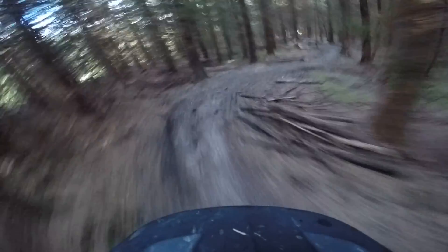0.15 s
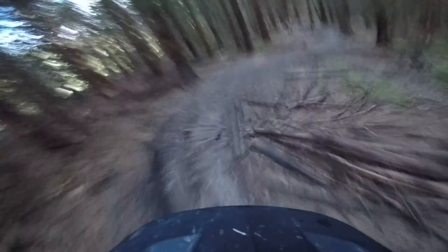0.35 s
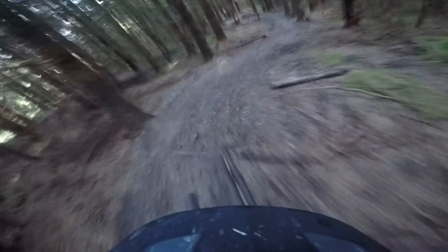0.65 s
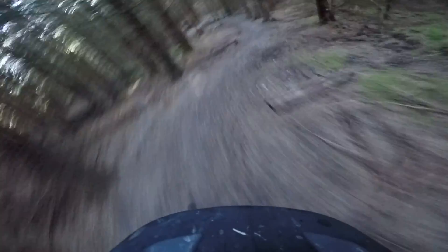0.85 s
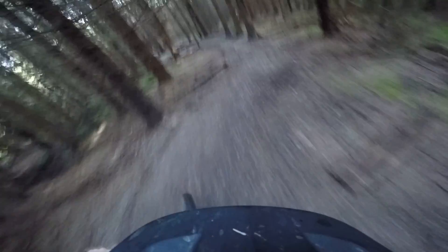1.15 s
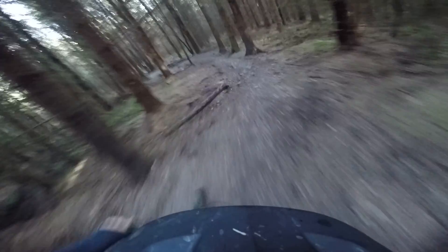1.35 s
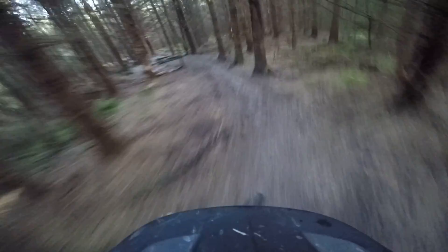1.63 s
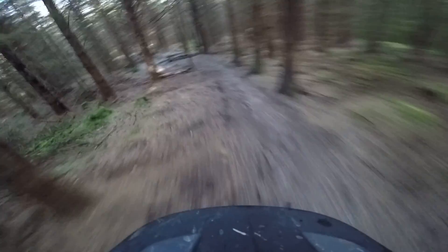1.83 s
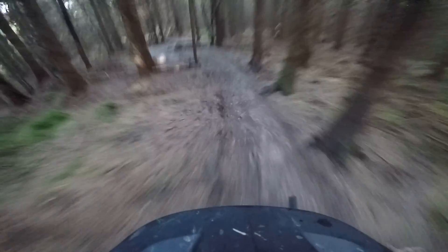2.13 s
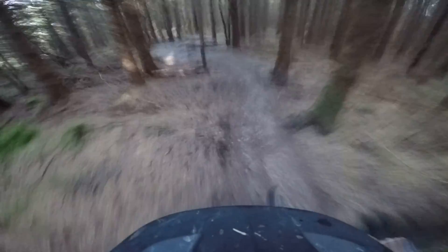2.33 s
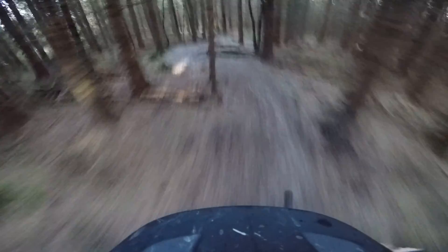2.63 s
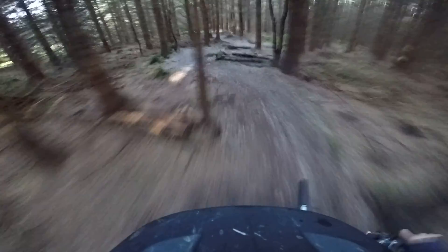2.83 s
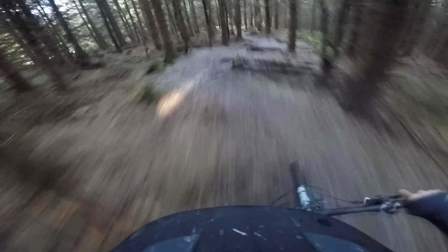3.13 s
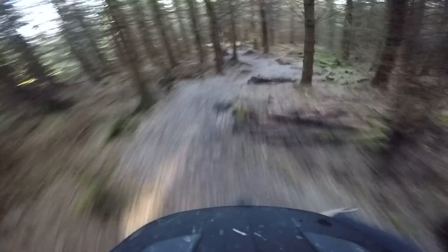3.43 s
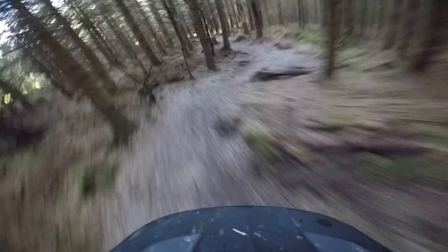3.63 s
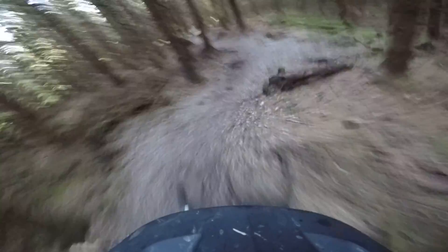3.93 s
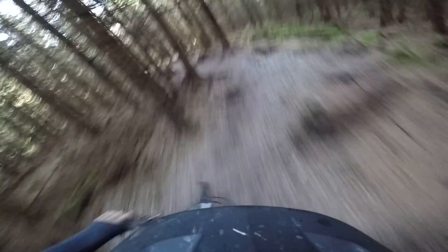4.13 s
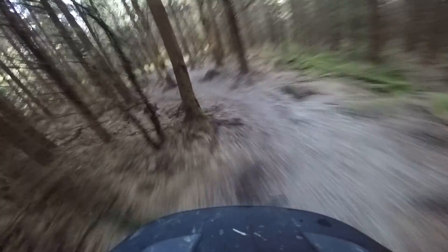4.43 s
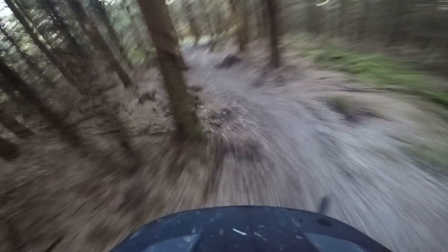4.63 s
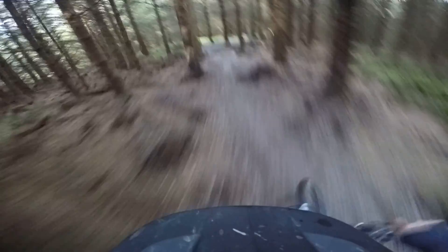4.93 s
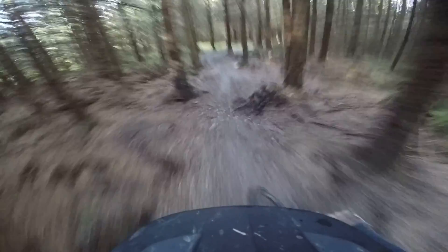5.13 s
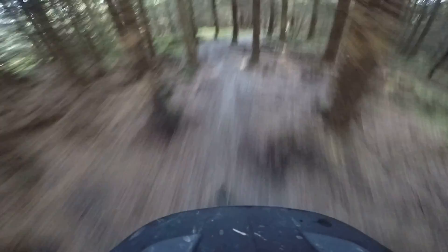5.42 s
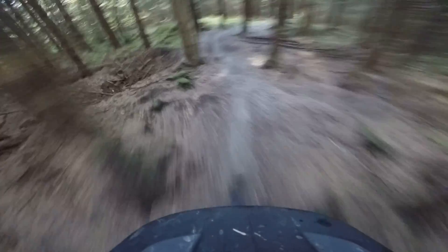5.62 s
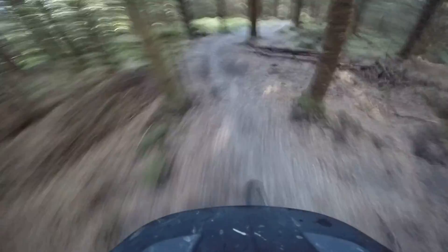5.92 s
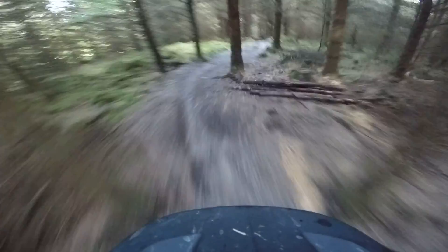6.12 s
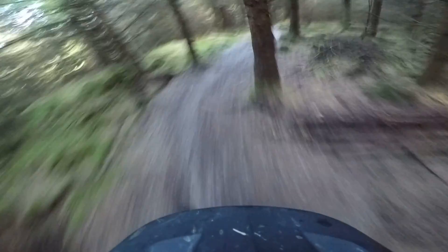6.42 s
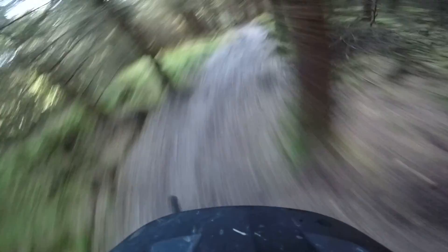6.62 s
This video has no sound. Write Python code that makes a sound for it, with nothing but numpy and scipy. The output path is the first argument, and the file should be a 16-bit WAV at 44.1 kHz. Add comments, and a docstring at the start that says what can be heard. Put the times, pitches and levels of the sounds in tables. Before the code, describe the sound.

A fast downhill bike ride heard from the helmet: low wind slaps, rushing tyres on gravel, buzzing freewheel, clattering chain and dull jolts.

```python
"""A mountain bike runs fast down a forest trail, heard from the rider's helmet.
From the start wind buffets the microphone (shed eddies), the helmet drones (filtered noise), tyres roar and
spray grit (random grains), the freewheel buzzes (pulsed noise) and a faint whistle pulses (a sine).
Soon chain and frame knock (struck modes), parts zing (stick-slip) and tick, wind slaps the microphone (pulses),
tyres crunch stones (coarse grains), and the hardest bumps thump through the helmet (a decaying mode)."""
import sys
import numpy as np
from scipy import signal
from scipy.fft import rfft, irfft, next_fast_len
from scipy.io import wavfile
from scipy.ndimage import uniform_filter1d

SR = 44100
rng = np.random.default_rng(int(sys.argv[2]) if len(sys.argv) > 2 else 0)


def generate_wav(sig):
    """Save sig (samples, or channels by samples) to the path in sys.argv[1] as 16-bit PCM at SR."""
    pcm = np.round(np.clip(np.atleast_2d(sig).T, -1, 1) * 32767).astype(np.int16)
    wavfile.write(sys.argv[1], SR, pcm)


N = 298557
TIME = np.arange(N) / SR

# hardest slaps of wind, each a separate pressure pulse: (time [s], peak before rounding off [dB], width [s])
SLAPS = [(0.245, -5.5, 0.023), (0.324, -5, 0.027), (0.635, -4.5, 0.019), (0.799, -3.5, 0.022),
         (1.244, -6, 0.02), (1.69, -13.5, .013), (2.074, -5.5, 0.022), (2.306, -7.5, 0.017),
         (3.108, -5, 0.021), (3.805, -8, 0.021), (3.91, -0.5, 0.019), (4.36, -7, 0.019),
         (5.085, -7.5, 0.017), (5.777, -5, 0.025), (6.393, -4.5, 0.026)]
# hard bumps that shake the helmet:
# (time [s], peak [dB], settled pitch [Hz], t60 [s], judder relative to the thump [dB])
BUMPS = [(0.752, -21, 104, 0.2, -26), (0.94, -27.5, 104, 0.39, -20), (2.346, -21, 104, 0.3, -19),
         (2.452, -25, 105, 0.12, -19), (3.838, -15.5, 109, 0.15, -20), (3.882, -21, 115, 0.11, -10),
         (4.712, -28, 108, 0.17, -23), (4.808, -28, 113.5, 0.18, -19), (5.052, -9.5, 105.5, 0.12, -15.5),
         (5.076, -26, 124, 0.12, -8), (5.749, -30, 100, 0.24, -22), (6.3, -29, 105, 0.1, -4.5)]


def from_db(db):
    """Level as the logarithm of amplitude: decibels to gain."""
    return 10 ** (np.asarray(db) / 20)


def rms_one(x):
    """Effective value: scale to rms 1."""
    return x / np.sqrt(np.mean(x ** 2) + 1e-20)


def peak_one(x):
    """Peak amplitude: scale to peak 1."""
    return x / np.max(np.abs(x))


def blow_one(x):
    """Energy of a transient: scale a blow to the energy of 16 ms at rms 1."""
    return x / np.sqrt(np.sum(x ** 2) / (.016 * SR))


def in_time(rows):
    """Linear interpolation: the columns of a curve at every sample."""
    s, *columns = np.transpose(rows)
    return [np.interp(TIME, s, c) for c in columns]


def add(out, s, sound):
    """Superposition: mix a short sound in at time s."""
    at = max(round(s * SR), 0)
    out[at:at + len(sound)] += sound[:N - at]


def coloured(x, spectrum):
    """Linear filtering: shape a steady signal by gains over log frequency, to rms 1."""
    size = next_fast_len(N)
    hz, db = np.transpose(spectrum)
    bins = np.maximum(np.arange(size // 2 + 1) * SR / size, 1)
    gain_db = np.interp(np.log(bins), np.log(hz), db, left=-100, right=-100)
    return rms_one(irfft(rfft(x, size) * from_db(gain_db), size)[:N])


def drift(per_s):
    """Slow random modulation: normal draws joined by straight lines, rms 1."""
    return rms_one(np.interp(TIME * per_s, np.arange(N), rng.standard_normal(N)))


def uneven(t, per_s, spread_db):
    """Random amplitude modulation of a short sound, as a gain."""
    return from_db(spread_db * np.interp(t * per_s, np.arange(len(t)), rng.standard_normal(len(t))))


def band(x, low_hz, high_hz):
    """Causal band-pass filtering."""
    edges = [low_hz, min(high_hz, SR / 2 - 1000)]
    return signal.sosfilt(signal.butter(2, edges, "band", fs=SR, output="sos"), x)


def evened(x, seconds):
    """Envelope normalisation: take the slow swells out of a noise, leaving its fast ones."""
    window = int(seconds * SR)
    power = uniform_filter1d(uniform_filter1d(x ** 2, window), window)
    return x / np.sqrt(power + 1e-9)


def dying(t, t60):
    """Exponential decay by 60 dB in t60."""
    return np.exp(-np.log(1000) * t / t60)


def ring(t, hz, t60):
    """Damped free vibration of a struck mode."""
    return np.sin(2 * np.pi * hz * t) * dying(t, t60)


def grains(per_s, spread_db):
    """Shot noise: random clicks of uneven size and sign, rms 1."""
    sizes = from_db(spread_db * np.minimum(rng.exponential(1, N), 4))
    return rms_one(sizes * rng.choice([-1, 1], N) * (rng.random(N) < per_s / SR))


def swell(start, length, edge_s):
    """Linear envelope: rise, hold and fall between 0 and 1, half way up at the start and the end."""
    return np.clip(.5 + np.minimum(TIME - start, start + length - TIME) / edge_s, 0, 1)


def summed_db(steady_db, swells, edge_s):
    """Power addition: level of a steady sound with swells of (start, length, dB) on top."""
    power = from_db(steady_db) ** 2
    power = power + sum((from_db(db) * swell(s, length, edge_s)) ** 2 for s, length, db in swells)
    return 10 * np.log10(power)


def scattered(level_db, count):
    """Stratified sampling: a random moment in each equal stretch of the ride, with the level there."""
    times = (np.arange(count) + rng.random(count)) / count * TIME[-1]
    return zip(times, np.interp(times, TIME, level_db))


def shell(x):
    """Resonant transmission: modes of helmet shell and visor lift or lower narrow bands."""
    # resonances in series: (frequency [Hz], width [Hz], lift, negative for a dip [dB])
    resonances = [(360, 18, 3), (455, 142, -4.5), (600, 35, 3.5), (677, 128, -3.5), (825, 30, 3.5),
                  (1004, 166, 2), (1410, 85, 3), (1939, 119, 8.5), (2200, 53, 0), (2414, 68, 5),
                  (3730, 93, 6), (4545, 340, 9.5)]
    for hz, width_hz, lift_db in resonances:
        x = x + (from_db(lift_db) - 1) * signal.lfilter(*signal.iirpeak(hz, hz / width_hz, fs=SR), x)
    return x


def wind(crest=1.08, tearing_db=4.0):
    """Eddy shedding: the helmet sheds eddies unevenly; each presses in a sharp crest with a puff of flutter."""
    # gusts over the steady airstream: (start [s], length [s], slow buffeting [dB], fast flutter [dB])
    gusts = [(0.068, 0.099, -13.5, -27), (0.183, 0.2, -12, -29), (0.513, 0.21, -16.5, -32),
             (0.698, 0.15, -14, -30), (0.922, 0.22, -15, -26), (1.193, 0.15, -14.5, -27.5),
             (2.028, 0.17, -13, -26), (2.19, 0.23, -12, -21), (2.46, 0.13, -14.5, -21.5),
             (2.742, 0.049, -13.5, -33), (2.928, 0.1, -15, -24), (3.188, 0.23, -16.5, -30),
             (4.22, 0.13, -21.5, -27.5), (4.69, 0.12, -22, -30.5), (4.904, 0.3, -17, -31.5),
             (5.56, 0.25, -13, -31.5), (5.886, 0.32, -18, -28.5), (6.274, 0.16, -12, -32),
             (6.512, 0.21, -15, -30.5)]
    # spectrum of the fast flutter: (frequency [Hz], relative level [dB])
    flutter_spectrum = [(15, -5), (24, 1.5), (38, 3.5), (50, -7), (75, -12), (130, -23), (300, -51.5)]
    gust_edge_s = 0.0396   # rise and fall of a gust
    clear_s = 0.042        # a slap displaces the small eddies for about this long either side
    jerk_s = 0.058         # a bump jerks the head through the air for this long
    # flutter levels are relative to the peak of the bump or slap
    jerks = [(s, jerk_s, db - 9.5) for s, db, *_ in BUMPS]
    puffs = [(s - clear_s / 2, clear_s, db - 24) for s, db, _ in SLAPS]
    near_slap = np.max([np.exp(-((TIME - s) / clear_s) ** 2) for s, _, _ in SLAPS], axis=0)
    between_slaps = 1 - near_slap ** 2
    slow_gusts = [(s, length, db) for s, length, db, _ in gusts]
    fast_gusts = [(s, length, db) for s, length, _, db in gusts]
    buffet_db = summed_db(-24.5, slow_gusts, gust_edge_s)
    flutter_db = summed_db(-34.5, fast_gusts + jerks + puffs, gust_edge_s)
    eddies_per_s = 13.0 * np.exp(.3 * drift(22))
    eddy = np.cos(2 * np.pi * np.cumsum(eddies_per_s) / SR)
    pressure = np.exp(crest * eddy)   # sharp crests, round troughs
    flutter = evened(coloured(rng.standard_normal(N), flutter_spectrum), seconds=0.069)
    flutter = rms_one(flutter * from_db(tearing_db * eddy))
    lumps_db = 1.5 * drift(11)   # the airstream is never even
    buffets = from_db(buffet_db + lumps_db) * rms_one(pressure - pressure.mean()) * between_slaps
    push = slaps() + buffets + from_db(flutter_db + lumps_db) * flutter
    # the strongest gusts are rounded off
    return 1.3 * np.tanh(push / 1.3)


def helmet(stiffening=0.34, settle_s=0.0043):
    """Forced and free vibration: the trail keeps the helmet droning; a bump rings its mode and judders its mount.

    The thump starts sharp in pitch while the padding is squeezed, then settles."""
    # shaking of the helmet: (time [s], relative drone level [dB], relative rumble level [dB])
    shake = [(0, -46.5, -50), (0.9, -57.5, -60), (1.36, -48, -58), (1.5, -42.5, -54.5), (1.72, -47, -53.5),
             (2.4, -41, -48), (2.62, -44, -50), (3.15, -45.5, -48.5), (3.7, -45.5, -54.5),
             (4.05, -49.5, -57.5), (4.68, -45.5, -48), (5.4, -41.5, -51), (5.75, -47, -51.5),
             (6.3, -44, -46.5), (6.77, -42.5, -47.5)]
    # spectra of drone and rumble: (frequency [Hz], relative level [dB])
    drone_spectrum = [(50, -32), (85, -29), (102, -5.5), (114, 1), (130, -10.5), (147, -19.5), (163, -9),
                      (185, -38), (300, -59)]
    rumble_spectrum = [(130, -4.5), (190, 0.5), (250, -3.5), (310, -13), (380, -7), (470, -9.5),
                       (650, -11.5), (1200, -30)]
    drone_db, rumble_db = in_time(shake)
    drone = evened(coloured(rng.standard_normal(N), drone_spectrum), seconds=0.23)
    rumble = shell(evened(coloured(rng.standard_normal(N), rumble_spectrum), seconds=0.077))
    out = from_db(drone_db + 4.5) * drone + from_db(rumble_db + 1.7 * drift(30)) * rumble
    t = TIME[:SR // 2]
    hurried = t + stiffening * settle_s * (1 - np.exp(-t / settle_s))
    for s, db, hz, t60, judder_db in BUMPS:
        thump = peak_one(ring(hurried, hz, t60) * (1 - dying(t, t60=0.031)))
        judder = peak_one(band(rng.standard_normal(len(t)) * dying(t, t60), 144, 257))
        add(out, s, from_db(db) * peak_one(thump + from_db(judder_db) * judder))
    return out


def tyres(roar_db, grit_db, clump_db=1.5):
    """Superposed random impacts: knobs slap dirt and crush grit in clumps; both flutter with the wheel load."""
    # spectra of roar and grit: (frequency [Hz], relative level [dB])
    roar_spectrum = [(300, -7), (550, 0.5), (850, 0.5), (1400, 1.5), (1750, -3.5), (2300, -1), (2700, -1.5),
                     (3200, -15), (5000, -26.5)]
    grit_spectrum = [(1600, 2.5), (2500, 3.5), (3600, 1), (4300, -13), (5300, -13.5), (7000, -15),
                     (14000, -29)]
    load_db = 1.02 * drift(18)
    knob_slaps = grains(per_s=4500, spread_db=2.8)
    crushes = grains(per_s=8000, spread_db=2.0)
    roar = coloured(knob_slaps * from_db(clump_db * drift(180)), roar_spectrum)
    grit = coloured(crushes * from_db(clump_db * drift(180)), grit_spectrum)
    return from_db(roar_db - 3.0 + load_db) * roar + from_db(grit_db - 1.0 + load_db) * grit


def gravel(roar_db, per_s=70, level_db=-11.5, spread_db=3.5, cycles=10.4, tilt_db=-0.5):
    """Impulse response of resonators: single stones crack under the tread, each ringing at one of 18 pitches.

    A ring falls 60 dB in the given cycles; the tilt is in dB per octave."""
    pitches = np.geomspace(780, 2800, 18)
    cracks, dealt = grains(per_s, spread_db), rng.integers(0, len(pitches), N)
    out = 0
    for k, hz in enumerate(pitches):
        radius = from_db(-60 * hz / (cycles * SR))   # decay per sample
        w = 2 * np.pi * hz / SR
        struck = cracks * (dealt == k) + 1e-18   # the offset keeps the filter off denormal numbers
        stone = signal.lfilter([0, np.sin(w)], [1, -2 * radius * np.cos(w), radius * radius], struck)
        out = out + from_db(tilt_db * np.log2(hz / pitches[0])) * stone
    return from_db(roar_db + level_db) * rms_one(out)


def freewheel(level_db, pawl_hz=310, scatter_db=11.0, hiss_db=2.0):
    """Periodic impacts: pawls snap over the ratchet as decaying bursts, over a fine hiss of flung sand."""
    # spectrum of the buzz and hiss: (frequency [Hz], relative level [dB])
    buzz_spectrum = [(3000, -2), (4500, 2.5), (5500, 1.5), (6600, 3.5), (8000, -3), (9300, 1), (10600, 3),
                     (12000, -5), (14000, -3), (15500, -15)]
    teeth = np.cumsum(pawl_hz * from_db(0.73 * drift(3))) / SR
    bursts = from_db(-30 * (teeth % 1)) * rng.standard_normal(N)   # 30 dB down by the next tooth
    snaps = rms_one(bursts * from_db(scatter_db * np.tanh(drift(150))))
    sand = grains(per_s=9000, spread_db=2.0)
    return from_db(level_db + 2.0) * coloured(snaps + from_db(hiss_db) * sand, buzz_spectrum)


def whine(hz=8490, pulse_hz=20.0, level_db=-75):
    """Phase and amplitude modulation: a faint, unsteady electronic whistle that pulses."""
    tone = np.sin(2 * np.pi * hz * TIME + 1.5 * drift(40))
    pulse = ((1 + np.sin(2 * np.pi * pulse_hz * TIME)) / 2) ** 2
    return from_db(level_db) * tone * pulse


def knock(group_db, shiver_db=-10.5, crack_db=-21.0, chatter_db=3.0, chatter_per_s=420):
    """Modal excitation: one blow rings the frame in four groups of modes; loose parts chatter unevenly after it."""
    # modes of the frame: (frequency [Hz], relative strength [dB], t60 [s])
    frame = [(224.3, -4.5, 0.038), (376, -12.5, 0.018), (655, 1, 0.0067), (753, -3.5, 0.029),
             (962, 0.5, 0.025), (1120, -1, 0.019), (1310, -3, 0.03), (1530, 5.5, 0.027),
             (1769, -3.5, 0.035), (2057, -2.5, 0.02), (2305, -2.5, 0.048), (2682, 0.5, 0.03),
             (2830, -7, 0.022)]
    # edges of the thud, knock, clack and snap groups: (frequency [Hz])
    group_edges = [170, 680, 1450, 2150, 3300]
    t = TIME[:SR // 8]
    chatter = uneven(t, chatter_per_s, chatter_db)
    contact = 1 - dying(t, t60=0.0017)   # the force builds over about a millisecond
    out = 0
    for level_db, low_hz, high_hz in zip(group_db, group_edges, group_edges[1:]):
        modes = 0
        for hz, db, t60 in frame:
            if low_hz < hz <= high_hz:
                # each blow lands on another spot, so strength and pitch of a mode vary
                strength = from_db(db + 2.2 * rng.standard_normal()) * rng.choice([-1, 1])
                modes = modes + strength * ring(t, hz * (1 + 0.034 * rng.standard_normal()), t60)
        struck = blow_one(band(modes * contact, low_hz, high_hz))
        shiver = rng.standard_normal(len(t)) * chatter * dying(t, t60=0.072)
        struck = struck + from_db(shiver_db) * blow_one(band(shiver, low_hz, high_hz))
        out = out + from_db(level_db) * blow_one(struck)
    crack = band(rng.standard_normal(len(t)) * contact * dying(t, t60=0.041), 2700, 5300)
    return out + from_db(group_db[-1] + crack_db) * blow_one(crack)


def zing(hz, t60, width_hz, slip_db=2.5, slips_per_s=350):
    """Stick-slip friction: a rubbed part sings a rough note, narrow noise shifted up to its pitch."""
    t = TIME[:SR // 2]
    slips = uneven(t, slips_per_s, slip_db)
    low_pass = signal.butter(2, min(width_hz, hz / 2), fs=SR, output="sos")
    rough = signal.sosfilt(low_pass, rng.standard_normal((2, len(t))) * slips * dying(t, t60))
    phase = 2 * np.pi * hz * t
    return peak_one(rough[0] * np.cos(phase) + rough[1] * np.sin(phase))


def rattles(roar_db, tap_db=(-11, -8.5, -11.5, -17), tap_spread_db=3.5):
    """Repeated impact: a slack chain hits, then bounces; light taps and scraped zings lie in between.

    Taps (thud, knock, clack, snap) are relative to the roar level."""
    # knocks of chain and frame, as relative energies:
    # (time [s], thud [dB], knock [dB], clack [dB], snap [dB])
    knocks = [(0.105, -55.5, -38, -45, -46), (0.167, -34.5, -39, -43.5, -51),
              (0.194, -42.0, -40, -41, -43.5), (0.283, -62, -49, -53, -62), (0.367, -46, -58, -52, -52),
              (0.61, -58, -51, -51, -58), (0.674, -43, -52, -50, -48.0), (0.707, -64.0, -38, -43, -56),
              (0.732, -46, -35.5, -53, -54), (0.796, -63, -34.5, -40, -50), (0.872, -65.0, -48, -59, -64),
              (0.941, -38.5, -37, -40.5, -47), (0.952, -51, -44, -48, -53), (1.078, -47, -38.5, -42, -57),
              (1.167, -40, -41, -53, -60), (1.244, -39, -38, -46, -57), (1.282, -64.5, -45, -54, -65.5),
              (1.303, -44, -51, -66, -67), (1.421, -40, -43, -51, -65.5), (1.496, -56, -47.5, -50, -56),
              (1.722, -46, -43.5, -49, -63), (1.857, -56, -48.5, -51.5, -67.5),
              (2.088, -41.5, -39, -43, -48), (2.113, -61, -40.5, -45.5, -64), (2.142, -58, -50, -55, -64),
              (2.234, -39, -43, -45, -48.5), (2.265, -38.5, -38.5, -62.0, -50), (2.286, -56, -44, -57, -67),
              (2.316, -44, -41, -45, -53), (2.331, -57.5, -43, -55.5, -61),
              (2.345, -32.5, -38.5, -48, -52.5), (2.366, -46, -45, -54, -53), (2.378, -48, -43, -60, -61),
              (2.42, -49, -51, -61, -65), (2.458, -44.0, -49, -55, -51), (2.484, -34.5, -31.5, -45.5, -45),
              (2.513, -56, -41.5, -48, -51), (2.752, -39, -42, -45.5, -53), (2.838, -50, -45, -54, -60),
              (2.855, -44.0, -43.5, -54, -68), (2.974, -40, -39, -46.5, -55), (3.174, -47, -52, -62, -66),
              (3.187, -42, -53, -53, -55), (3.349, -47, -54, -61, -62), (3.376, -60, -45, -51, -48),
              (3.757, -35.5, -43, -54.0, -58.5), (3.764, -48.5, -37, -41.5, -51),
              (3.812, -58, -49, -49, -55), (3.835, -40, -43.5, -46, -54), (3.867, -33, -27, -41, -42.5),
              (3.881, -41, -44.5, -42, -47), (3.959, -69, -43.5, -46, -65), (4.006, -45, -42.5, -64.0, -63),
              (4.101, -44.5, -48, -65, -50), (4.257, -37, -45, -48, -66.0), (4.267, -36, -38.5, -48, -51),
              (4.303, -44, -34.5, -47, -49), (4.317, -55, -47, -49, -51), (4.359, -52, -43, -49.5, -64),
              (4.449, -65, -51, -57, -55), (4.478, -47, -59, -66.0, -57), (4.543, -41.5, -56, -73, -65),
              (4.635, -50.5, -44.5, -56, -68), (4.711, -40, -37.5, -43, -52), (4.769, -47, -47, -52, -52),
              (4.785, -60, -52, -47, -52), (4.808, -35.5, -31, -43.5, -42), (4.829, -56, -54, -49, -59),
              (4.893, -41.5, -47.5, -54, -56), (5.002, -38, -40.5, -44.5, -54), (5.011, -51, -48, -48, -54),
              (5.045, -49, -40, -62, -63), (5.052, -28.5, -30, -42, -41), (5.249, -47, -40.5, -60, -50),
              (5.311, -66, -51.5, -56, -57), (5.489, -63, -44.5, -55, -58), (5.668, -59, -51, -50, -55),
              (5.725, -54, -43, -46, -62), (5.78, -67, -41.5, -48, -54.5), (5.857, -62, -50.5, -55, -67),
              (5.911, -40.5, -37, -48, -46), (5.986, -54, -40, -46, -62), (5.999, -37.5, -51, -57.0, -65),
              (6.14, -61, -38.5, -47, -67), (6.232, -65, -39, -42, -55), (6.306, -43.5, -41.5, -49, -53),
              (6.347, -62, -52, -53, -55), (6.416, -43.5, -50, -56, -58), (6.458, -40, -50, -58, -62),
              (6.548, -59, -34.5, -41, -50)]
    # zings and rubs of chain, spokes and brakes, peak before the shell:
    # (time [s], relative peak [dB], frequency [Hz], t60 [s], half width [Hz])
    zings = [(0.105, -34, 2580, 0.11, 190), (0.813, -33, 2000, 0.04, 280), (0.825, -33, 2250, 0.037, 330),
             (0.836, -35, 1690, 0.04, 320), (0.904, -34.5, 1550, 0.06, 300), (1.205, -38, 1900, 0.12, 160),
             (1.207, -47, 3050, 0.11, 150), (1.456, -39.5, 2100, 0.2, 450), (1.497, -37, 1750, 0.22, 420),
             (1.507, -35, 1400, 0.19, 450), (2.186, -37.5, 1800, 0.054, 500), (2.901, -37, 2005, 0.12, 300),
             (3.374, -25.5, 1994, 0.058, 220), (3.64, -46.5, 1870, 0.73, 60),
             (4.115, -37.5, 2104, .16, 160), (4.15, -36, 2080, 0.059, 200), (4.217, -37.5, 2130, .06, 240),
             (4.317, -33, 1950, .04, 500), (5.18, -40, 1420, 0.14, 150), (5.321, -43.5, 1330, 0.21, 65),
             (6.53, -37, 1860, 0.1, 180)]
    out = np.zeros(N)
    for s, *group_db in knocks:
        hit, soft = knock(group_db), knock(group_db)
        lead, lag = rng.uniform(0.00054, 0.00382), rng.uniform(0.00504, 0.0094)
        add(out, s - lead, from_db(-12) * soft)   # soft onset
        add(out, s - .0005, from_db(1.5) * hit)
        add(out, s + lag, from_db(-14) * soft)   # bounce
    for s, db in scattered(roar_db, count=34):
        strength_db = db + np.array(tap_db) + rng.uniform(-tap_spread_db, tap_spread_db, size=4)
        add(out, s, knock(strength_db))
    for s, db, hz, t60, width_hz in zings:
        add(out, s, from_db(db) * zing(hz, t60, width_hz))
    return out


def ticks(freewheel_db, pebble_ring_db=-11, pebble_splash_db=-22, pebble_spread_db=1.0, pebble_t60_s=0.013):
    """Hard contact: a brief metallic ring under a bright splash, both from one decaying noise.

    Small stones tick at random moments, relative to the freewheel level."""
    # sharp ticks of metal and flung stones, as relative energies:
    # (time [s], ring [dB], splash [dB], t60 of the noise [s])
    hard_ticks = [(0.106, -44, -58, 0.052), (0.306, -56, -59, .026), (0.734, -55, -72, 0.0098),
                  (0.805, -56, -61, .067), (0.83, -55, -75, 0.055), (0.888, -53, -73, 0.086),
                  (0.935, -50, -55, 0.15), (1.016, -54, -57, 0.02), (1.495, -57.5, -82, .035),
                  (2.09, -52, -60, 0.0043), (2.186, -55, -65, 0.061), (2.236, -58, -63, 0.038),
                  (2.676, -56, -61, 0.015), (2.816, -48.5, -56, 0.064), (2.954, -55, -63, 0.018),
                  (3.023, -51, -61, 0.022), (3.1, -55, -59, 0.048), (3.26, -56, -59, 0.015),
                  (3.867, -55, -76, .012), (4.114, -55.5, -61, 0.053), (4.268, -55, -81, 0.015),
                  (4.55, -55.5, -65, .032), (4.705, -55, -61, .041), (5.305, -55.5, -81, 0.099),
                  (6.4, -53, -72, .014)]
    out, t = np.zeros(N), TIME[:SR // 12]
    pebbles = []
    for s, db in scattered(freewheel_db, count=18):
        ring_db = db + pebble_ring_db + rng.normal(0, pebble_spread_db)
        splash_db = db + pebble_splash_db + rng.normal(0, pebble_spread_db)
        pebbles.append((s, ring_db, splash_db, pebble_t60_s))
    for s, ring_db, splash_db, t60 in hard_ticks + pebbles:
        chatter = rng.standard_normal(len(t)) * dying(t, t60) * (1 - dying(t, t60 / 5))
        splash = band(band(chatter, 7500, 11800), 7500, 11800)
        add(out, s - .001, from_db(ring_db) * blow_one(band(chatter, 1450, 5100)))
        add(out, s - .001, from_db(splash_db) * blow_one(splash))
    return out


def slaps(lean=0.4):
    """Pressure pulse of a bursting eddy: suction, a sharp crest, then weaker suction.

    The lean is a phase in radians that deepens the suction ahead."""
    out, t = np.zeros(N), TIME[:SR // 3]
    middle = t[-1] / 2
    for s, db, width_s in SLAPS:
        pulse = np.real(np.exp(-1j * lean) / (1 - 1j * (t - middle) / width_s) ** 3)
        add(out, s - middle, from_db(db) * peak_one(pulse))
    return out


def crunches(edge_s=0.019):
    """Sparse shot noise: a tyre skids over loose stones in a short, coarse run of cracks."""
    # skids: (start [s], length [s], relative level [dB])
    skids = [(0.592, 0.019, -45), (0.929, 0.031, -39), (1.244, 0.016, -44), (2.181, 0.027, -42),
             (2.318, 0.073, -55), (2.436, 0.042, -39.5), (2.827, 0.025, -47.5), (4.812, 0.028, -48),
             (5, 0.028, -43), (5.189, 0.017, -45), (5.923, 0.014, -48), (6.21, 0.017, -41),
             (6.345, 0.029, -49)]
    # spectrum of the cracks: (frequency [Hz], relative level per Hz [dB])
    crack_spectrum = [(250, 3.5), (600, -6), (900, -2.5), (1400, 3.5), (1900, -7.5), (2600, 0), (3300, -17),
                      (5000, -19)]
    cracks = coloured(grains(per_s=1400, spread_db=2.5), crack_spectrum)
    return cracks * sum(from_db(db) * swell(s, length, edge_s) for s, length, db in skids)


def scene():
    """Transmission paths: the bike is heard past the helmet shell; wind and helmet reach the microphone directly.

    Only the helmet's rumble passes the shell as well."""
    # the tyres on the trail: (time [s], relative roar level [dB], relative grit level [dB])
    trail = [(0, -45.5, -57), (0.22, -42, -56), (0.48, -46, -60), (0.93, -46, -56), (1.3, -48, -58),
             (1.7, -50.5, -64.5), (2.0, -47.5, -57), (2.23, -43, -54.5), (2.47, -42.5, -52.5),
             (2.6, -46.5, -57.5), (3.5, -47, -55.5), (3.85, -44.5, -53.5), (4.25, -43.5, -57.5),
             (4.6, -46, -54), (5.05, -45.5, -57.5), (5.48, -47, -53.5), (5.98, -46.5, -53.5),
             (6.27, -41, -49.5), (6.6, -44, -50), (6.77, -42, -48.5)]
    # the wheels go light over a crest: (time [s], loss of tyre noise, negative for a gain [dB])
    crests = [(0.44, 4.5), (1.13, 1.5), (3.15, 2), (3.54, 3.5), (4.5, -2), (5.36, 5.5), (5.44, -1.5)]
    # the freewheel buzzes while the rider coasts: (start [s], length [s], relative level [dB])
    coasts = [(-0.1, 1.52, -64), (2.254, 1.27, -64), (3.636, 0.76, -64.5), (4.643, 0.51, -63.5),
              (6.25, .7, -73)]
    crest_s = 0.05     # about half the length of a lull
    grit_lull = 1.2    # the grit falls by this many times as many dB as the roar
    lull_db = sum(db * np.exp(-((TIME - s) / crest_s) ** 2) for s, db in crests)
    roar_db, grit_db = in_time(trail) - np.outer([1, grit_lull], lull_db)
    freewheel_db = summed_db(-71.5, coasts, edge_s=0.28)   # the steady part stays between coasts
    bike = tyres(roar_db, grit_db) + gravel(roar_db) + crunches() + freewheel(freewheel_db)
    bike = bike + rattles(roar_db) + ticks(freewheel_db)
    return (from_db(-1.5) * shell(bike) + wind() + helmet() + whine())[None]


def record(dry, cutoff_hz=15300):
    """Band limiting: the ends are eased over 3 ms and the top is cut steeply."""
    ends = np.clip(np.minimum(TIME, TIME[-1] - TIME) / .003, 0, 1)
    return signal.sosfilt(signal.ellip(10, .1, 80, cutoff_hz, fs=SR, output="sos"), dry * ends)


dry = scene()
out = record(dry)
generate_wav(out)
```